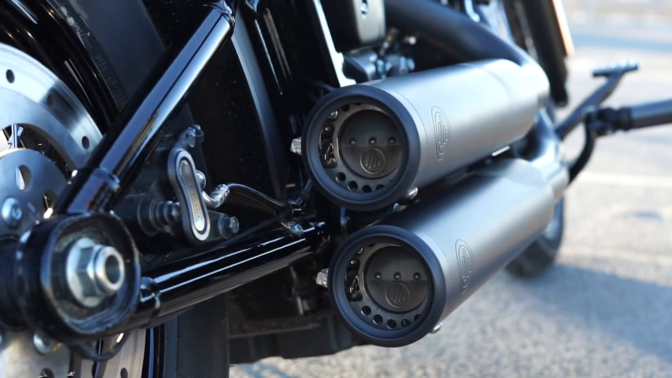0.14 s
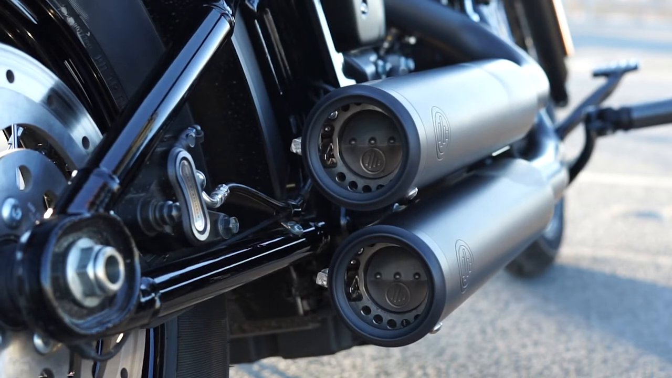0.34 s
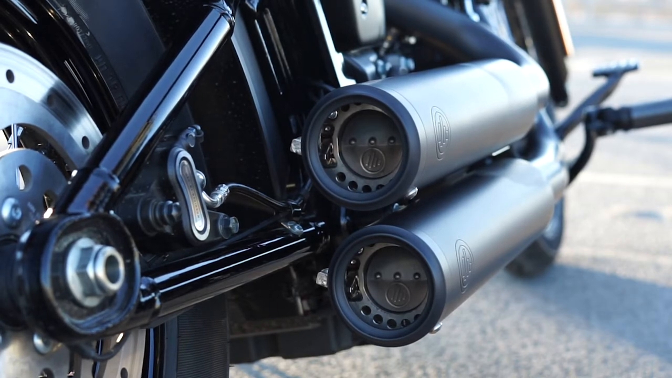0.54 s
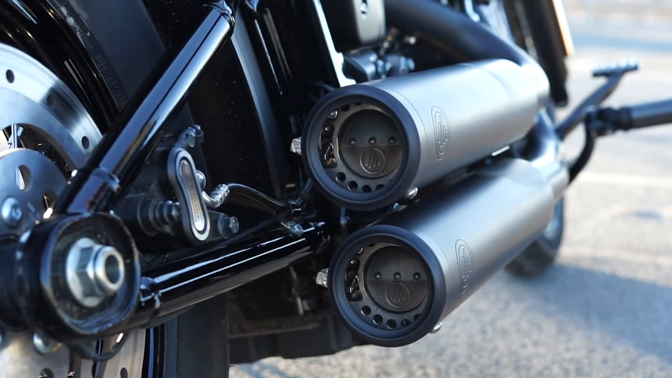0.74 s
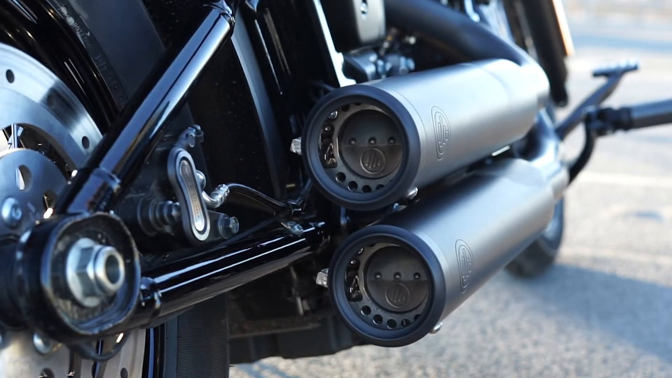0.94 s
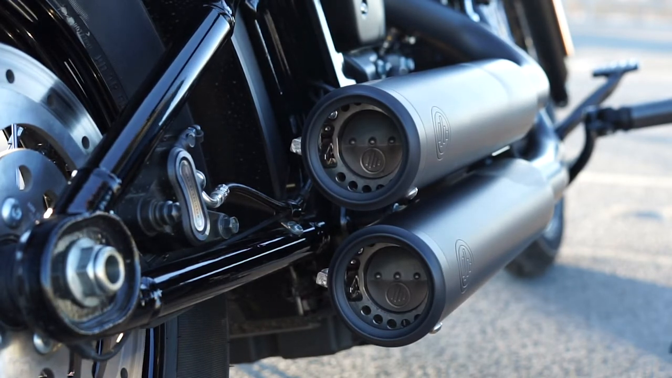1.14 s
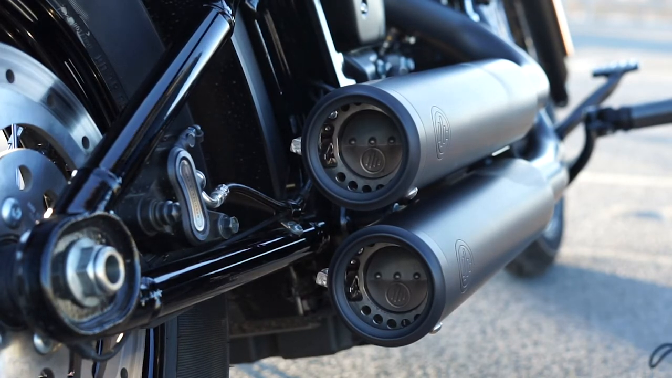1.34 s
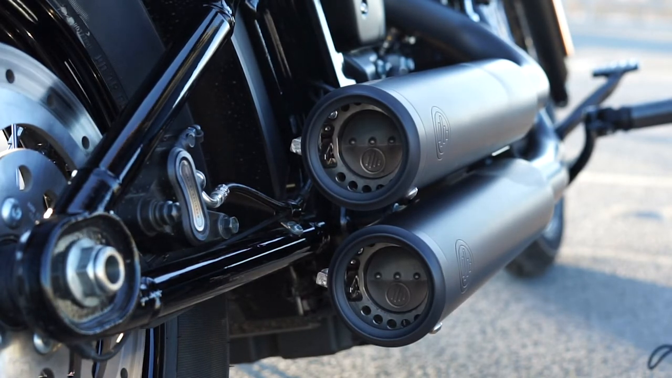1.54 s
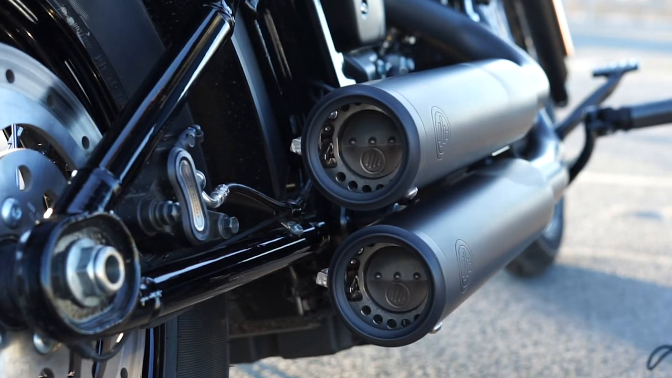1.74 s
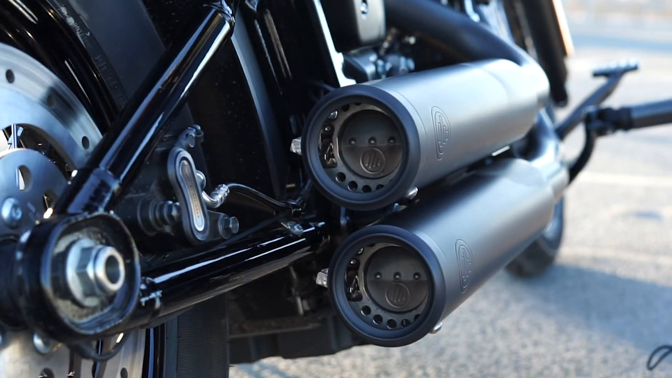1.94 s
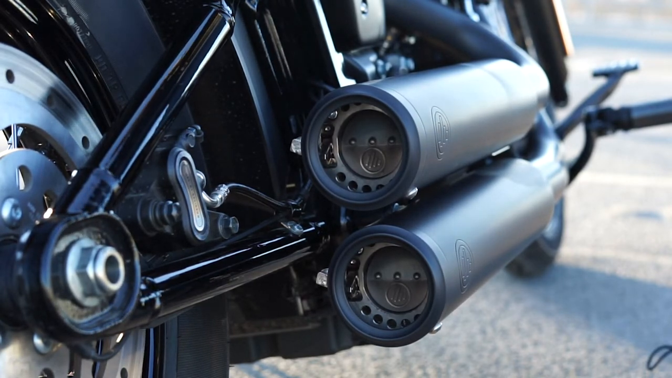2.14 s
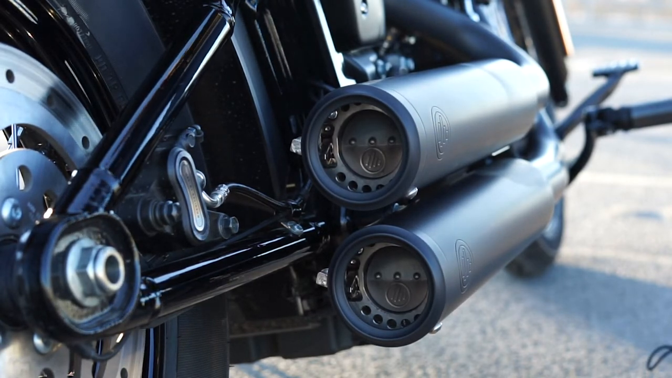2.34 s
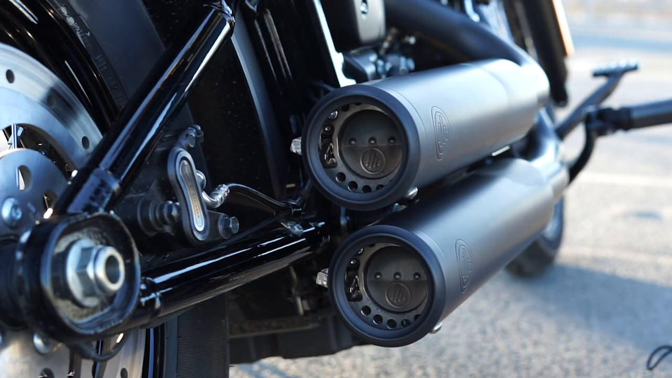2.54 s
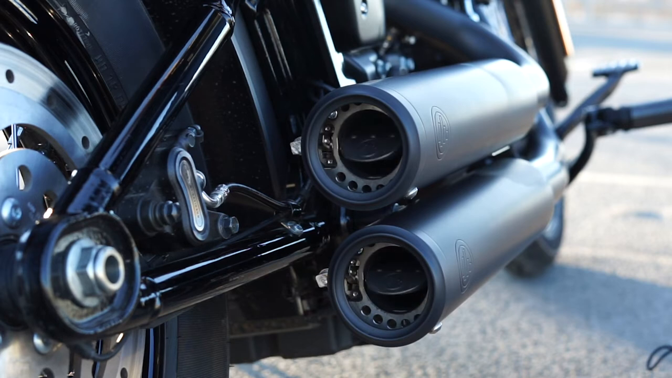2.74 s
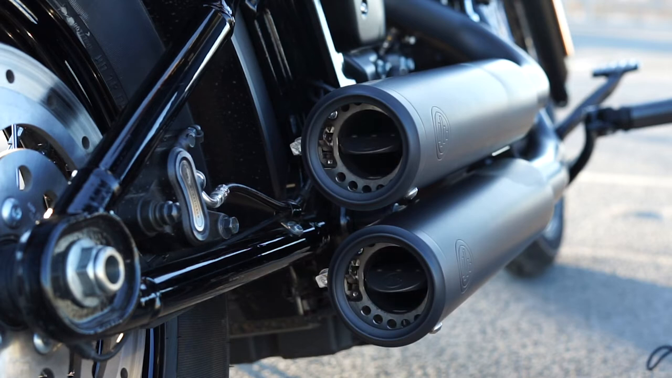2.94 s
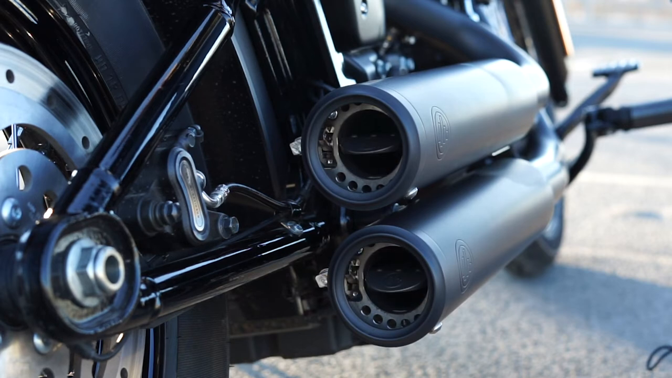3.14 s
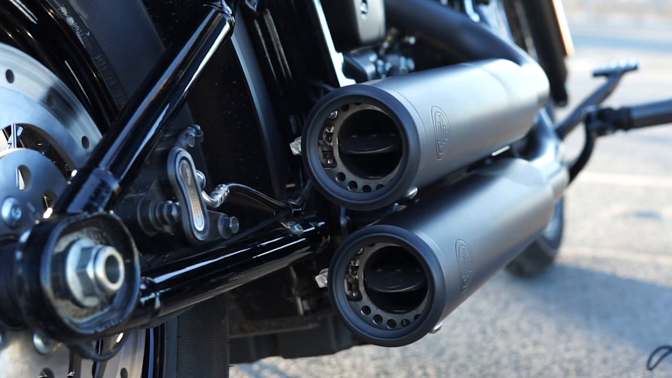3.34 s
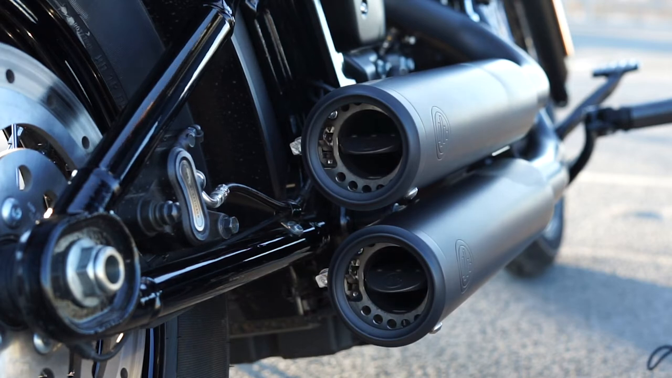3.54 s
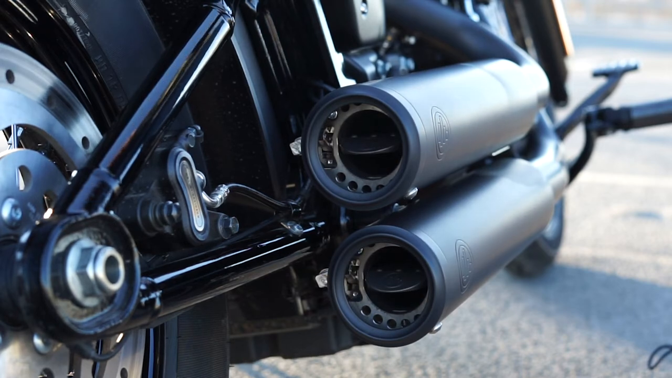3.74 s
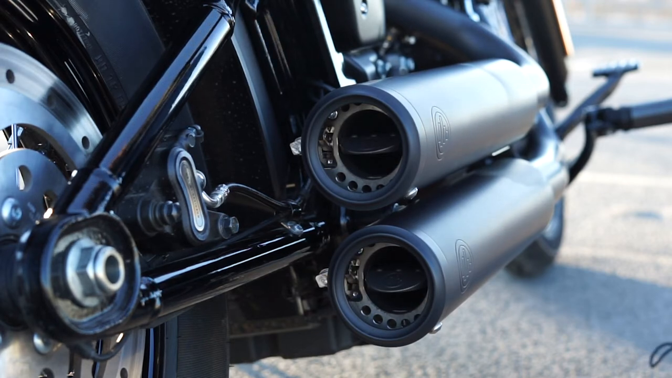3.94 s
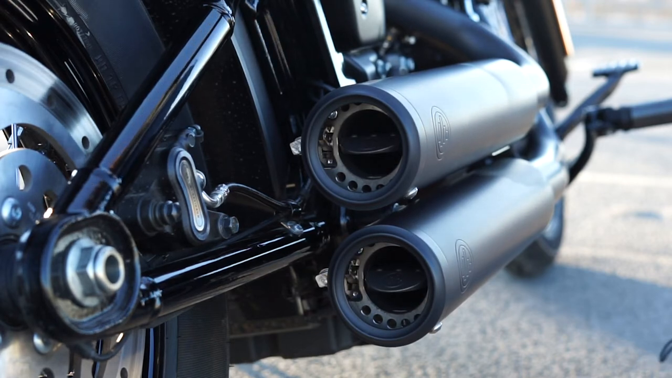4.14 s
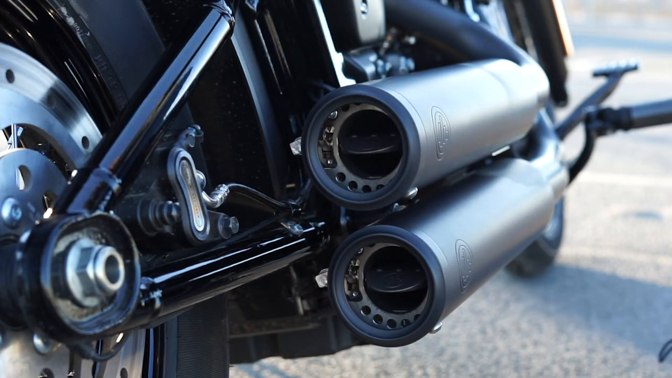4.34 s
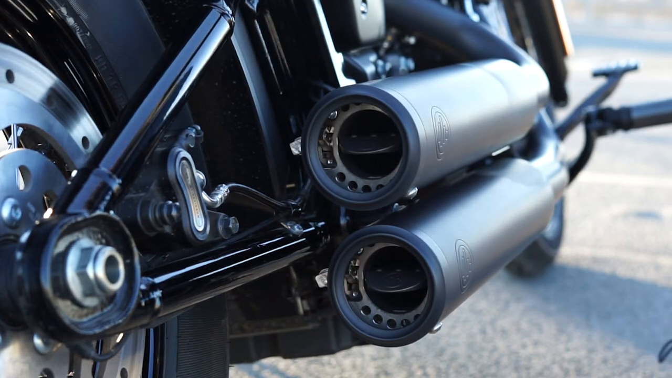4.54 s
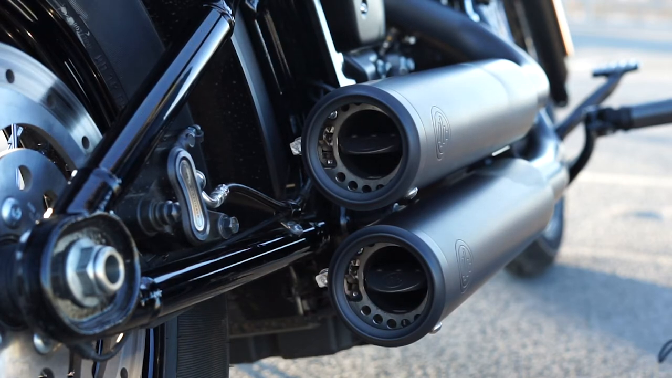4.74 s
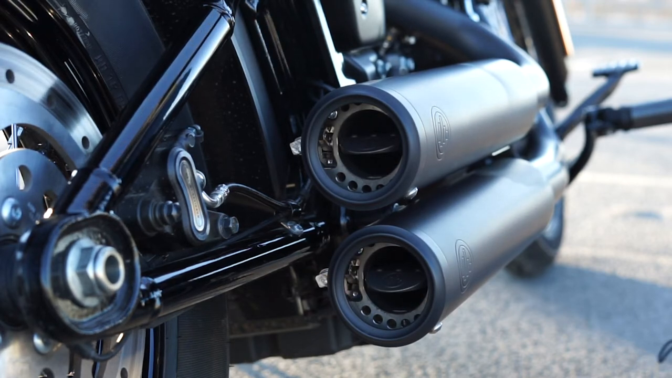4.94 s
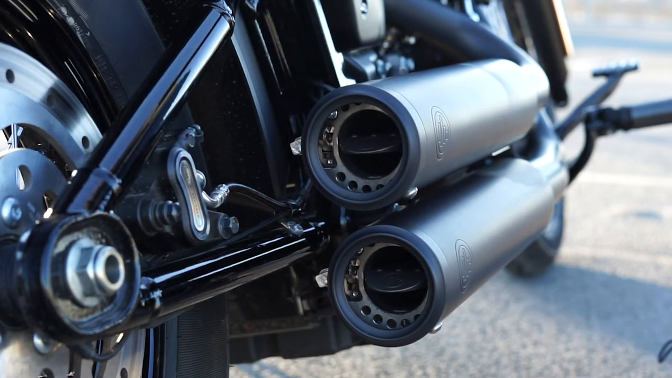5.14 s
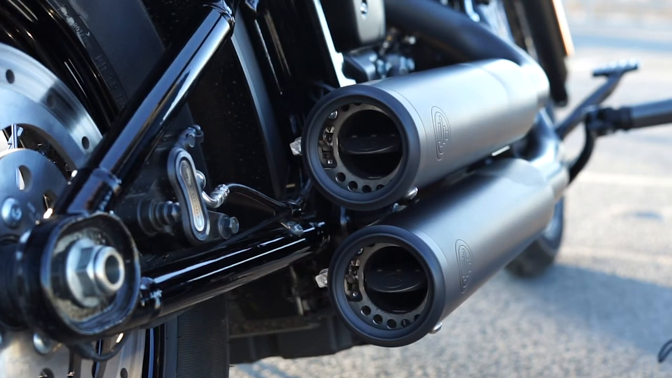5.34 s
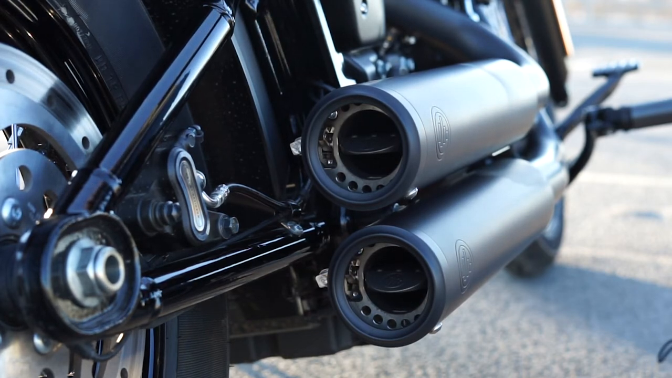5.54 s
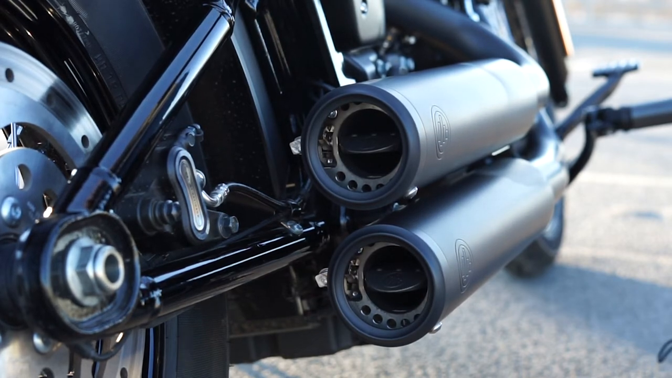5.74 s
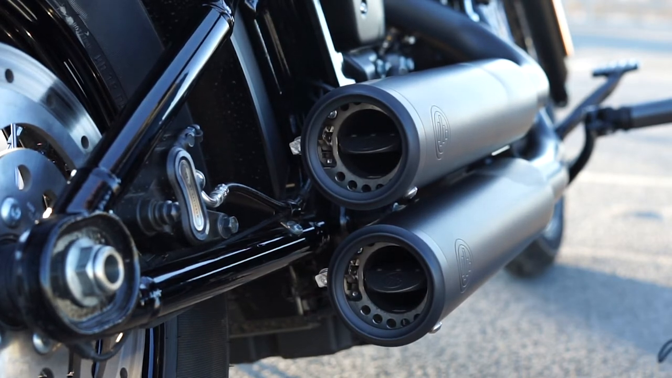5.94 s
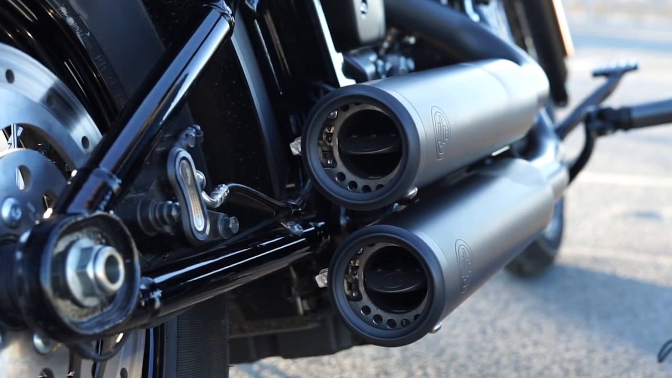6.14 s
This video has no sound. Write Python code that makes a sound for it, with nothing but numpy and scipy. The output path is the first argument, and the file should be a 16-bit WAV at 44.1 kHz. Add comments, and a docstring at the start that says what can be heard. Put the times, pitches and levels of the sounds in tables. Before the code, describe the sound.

Close behind a motorcycle, a subdued, uneven idle suddenly opens into a deep, rasping thump, ending with one sharp throttle blip.

```python
"""A big V-twin engine in a car park, heard close behind its two silencers, each closed by a flap.
First it sinks from high revs to an uneven idle: puffs of gas thud in the pipes and hiss past the flaps.
At about 2.7 s the flaps swing open, so the pipes boom and the firings leave as rasping cracks.
Near 5.8 s a quick twist of the throttle makes it bark. All along, the engine's moving parts clatter
underneath, and the loudest beats overload the microphone."""
import sys
import numpy as np
from scipy import signal
from scipy.fft import rfft, irfft
from scipy.io import wavfile
from scipy.ndimage import uniform_filter1d

SR = 44100
rng = np.random.default_rng(int(sys.argv[2]) if len(sys.argv) > 2 else 0)


def unload_wav(signal):
    """Save mono or channel-first audio to the path in sys.argv[1] as 16-bit WAV at rate SR, clipped to [-1, 1]."""
    wavfile.write(
        sys.argv[1],
        SR,
        np.round(np.clip(np.atleast_2d(signal).T, -1, 1) * 32767).astype(np.int16),
    )


N = 277389
T = np.arange(N) / SR
IDLE_RPM = 1000
CYCLE_DEG = 720  # the crankshaft turns twice for each cylinder to fire once
FLAP_OPENS_S, FLAP_SWING_S = 2.745, 0.062


def thump(crank, rpm, flap, overrun):
    """Puffs of gas make the pipes ring: short thuds with the flaps shut, a boom with them open."""
    # Four puffs per cylinder: valve opens, main surge, piston pushes the rest out, both valves open.
    # angle/deg, lead/s, width/s, strength when shut, strength when open, power by which speed fades it
    puffs = [(0, .013, 0.00076, 0.019, 0.65, -2), (0, 0.0039, 0.0011, 0.77, 1, 0.5),
             (109, 0.0028, 0.0023, 0.71, 0.035, -0.5), (211.2, 0.0006, 0.001, 0.026, 1, 1.5),
             (317, .012, 0.0013, 0.013, 0.45, -3.5), (308.9, 0, 0.002, 1, 0.9, 1),
             (449.7, 0.0019, 0.00087, 0.39, 0.1, 8.5), (531.8, 0.0022, 0.0014, 0.9, 0.74, 1)]
    # Pipe resonances when shut, when shut and slowing down, and when open: f/Hz, width/Hz, level/dB
    shut_modes = [(64.6, 39, -4.5), (122, 50, 0), (169, 55, -17)]
    burble_modes = [(89, 17, -11), (166, 32, 6.5), (197, 27, 0), (238, 18, -6.5)]
    open_modes = [(53.6, 16, -9), (92.7, 18.2, 3.5), (136.6, 47, -5), (230.2, 21.3, -2.5), (302.6, 50, -6)]
    # How loud the thump is over time: t/s, relative level/dB
    loudness = [(0.0, -13), (0.73, -23), (0.75, -16.5), (0.84, -19), (2.35, -16), (2.63, -17.5),
                (2.8, -8.5), (3.48, -8), (5.69, -11), (5.73, -22), (5.76, -6.5), (6.29, -6.5)]
    puff_delay_s = 0.0024  # a small delay of every thud
    muffler_hz = 353  # the silencer dulls the boom above this
    deg_per_s = rpm * 360 / 60
    shut_flow, open_flow = 0, 0
    for at_deg, lead_s, width_s, shut_size, open_size, fade in puffs:
        angle = crank + (lead_s - puff_delay_s) * deg_per_s
        puff = once_a_cycle(angle, at_deg, width_s * deg_per_s, scatter_db=2.0, wander_deg=6.94)
        puff *= (IDLE_RPM / rpm) ** fade
        shut_flow += shut_size * puff
        open_flow += open_size * puff
    swirl = 1 + 0.11 * noise([(20, -22), (200, 6.5), (400, 14), (700, -33), (2000, -52)])
    thuds = (1 - overrun / 2) * unit(ring(shut_flow * swirl, shut_modes))
    burble = 0.44 * overrun * unit(ring(shut_flow * swirl, burble_modes))
    muffler = signal.butter(4, muffler_hz, fs=SR, output="sos")
    boom = unit(signal.sosfiltfilt(muffler, ring(open_flow * swirl, open_modes)))
    pipes = (1 - flap) * (thuds + burble) + flap * boom
    average_level = np.sqrt(uniform_filter1d(pipes ** 2, size=SR // 4))  # over two idle cycles
    return undb(curve(loudness) + 1.0) * pipes / average_level


def rasp(crank, rpm, flap, throttle):
    """With the flaps open each firing leaves as a short crack: uneven at idle, a bark under throttle."""
    # Each cylinder's crack at idle: angle/deg, rasp level/dB, roar level/dB, random spread/dB
    cracks = [(-32.5, -19.5, -21, 1.3), (287, -30, -27.5, 3)]
    # Spells short of fuel, when the engine fires weakly: t/s, half length/s, level change/dB
    lean_spells = [(2.993, 0.067, -7), (4.233, 0.051, -6.5), (4.99, 0.056, -6), (5.228, 0.095, -5.5),
                   (5.662, 0.053, -7.5), (6.116, 0.05, -16)]
    # Tone of the bright rasp and of the lower roar: f/Hz, relative level/dB
    rasp_colour = [(1200, -9), (2000, -15), (2400, 2.5), (3000, 4.5), (3700, -3.5), (4200, -24), (4750, 2),
                   (5600, -23), (6300, -40), (6900, -16), (7600, -26), (8500, -14), (11000, -32),
                   (16000, -56)]
    roar_colour = [(250, 6.5), (500, 4.5), (650, -3.5), (780, 7), (1000, -9.5), (1250, -2), (2000, -7),
                   (4000, -8.5), (8000, -19), (16000, -25.5)]
    lead_s, width_s, ease_db_per_s = 0.003, 0.0037, 1.14
    bark_rasp_db, bark_roar_db = -12.5, -6.5
    deg_per_s = rpm * 360 / 60
    lean_db = sum(db * np.exp(-((T - s) / half_s) ** 4) for s, half_s, db in lean_spells)
    idling = (1 - throttle) * undb(lean_db - ease_db_per_s * since(FLAP_OPENS_S))
    bright, roar = 0, 0
    for at_deg, rasp_db, roar_db, scatter_db in cracks:
        burst = once_a_cycle(crank + lead_s * deg_per_s, at_deg, width_s * deg_per_s,
                             scatter_db * (1 - throttle), wander_deg=2.2, steepness=2.55)
        bright += burst * (idling * undb(rasp_db) + throttle * undb(bark_rasp_db))
        roar += burst * (idling * undb(roar_db) + throttle * undb(bark_roar_db))
    tear = 1 + 0.18 * noise([(200, 7), (900, -6), (3000, -37)])  # the jet breaks into small shocks
    return flap * tear * (bright * noise(rasp_colour) + roar * noise(roar_colour))


def chuff(crank, rpm, flap):
    """Gas squeezes past the shut flaps in hissing breaths, louder and steadier at higher speed."""
    # The breaths of one engine cycle: angle/deg, width/deg, strength
    breaths = [(-73, 42, 0.96), (121, 19, 0.27), (249, 37, 0.97), (501, 9.8, 0.46)]
    # Tone of the hiss: f/Hz, relative level/dB
    hiss_colour = [(300, -16), (700, -17), (1000, -7.5), (1400, 3), (2200, -2.5), (3300, 4.5), (4700, -5),
                   (5400, -2.5), (6000, -10.5), (6700, -4.8), (8700, -4.8), (10500, -12), (13500, -11),
                   (16000, -18)]
    pulses = sum(size * once_a_cycle(crank, at, width, scatter_db=0.7, wander_deg=8.7, steepness=2.44)
                 for at, width, size in breaths)
    lift = 0.63 * ramp(start_s=2.628, rise_s=0.079)  # the flaps lift a little just before they swing
    leak = np.clip(0.072 * (rpm / IDLE_RPM) ** 1.67 + lift, 0, 1)  # steady flow round their edges
    flow = leak + (1 - leak) * pulses
    flutter = 1 + 0.1 * noise([(50, 20), (500, -17), (2000, -21)])  # the jet wavers on the flap's edge
    level_db = -23.5 + 6.5 * np.log2(rpm / IDLE_RPM)
    return undb(level_db) * (1 - flap) * flow * flutter * noise(hiss_colour)


def clatter(crank, rpm, overrun):
    """Valves and chain rustle and tick, the metal casing rings, and a gear whines, most on slowing."""
    # Tone of the rustle: f/Hz, relative level/dB
    rustle_colour = [(100, 9), (300, 5.5), (420, 1), (680, -0.5), (830, 3), (1050, 0), (1400, -1.5),
                     (2200, -3), (2950, -4), (4000, -10.5), (6000, -21), (9000, -24), (12700, -29),
                     (16000, -38)]
    # Resonances of the casing: f/Hz, width/Hz, relative level/dB
    casing_modes = [(535.5, 29.6, 1), (575.4, 29, -7.5), (770, 84, -18.5), (885, 30, -15.5),
                    (1339, 56, -17.5), (2917, 120, -15.5)]
    # How loud the casing rings: t/s, level/dB
    casing_loudness = [(0, -26), (0.65, -40), (1.1, -33), (2.8, -31), (4.5, -36), (5.7, -36)]
    firing_deg, gear_teeth, ease_db_per_s = (0, 315), 90, 1.5
    load = sum(once_a_cycle(crank, at + 90, 57, scatter_db=2.5, wander_deg=56) for at in firing_deg)
    ticks = sum(once_a_cycle(crank, at + 130, 3.1, scatter_db=7, wander_deg=8.0) for at in firing_deg)
    rustle = undb(0.62) * unit(1 + 0.083 * load + 0.53 * ticks) * noise(rustle_colour)
    shaking = (0.76 + load) * rng.standard_normal(N)
    casing = 0
    for hz, width, db in casing_modes:
        tone = ring(shaking, [(hz, width, 0)])
        casing += ring(tone, [(hz, 4 * width, db)])  # a second pass trims the noise around the tone
    waver = noise([(5, -2), (35, -4), (120, -13), (500, -62)])
    whine = undb(-17.5 + 11.5 * overrun) * np.cos(gear_teeth * np.radians(crank)) * waver
    level_db = -31 + 6 * np.log2(rpm / IDLE_RPM) - ease_db_per_s * since(FLAP_OPENS_S)
    return undb(level_db) * (rustle + whine) + undb(curve(casing_loudness)) * unit(casing)


def rush(rpm, flap):
    """Gas whistles faintly past the open flaps, and adds a steady hiss at high revs."""
    # The whistle's narrow, high band: f/Hz, relative level/dB
    whistle_colour = [(12200, -70), (12600, 0), (13000, -70)]
    revving = np.clip(rpm / IDLE_RPM - 1, 0, 1)
    hiss = undb(-39.0) * revving * noise([(2000, -6), (4000, 8.5), (9000, -3.5), (16000, -10)])
    return flap * (hiss + undb(-67) * noise(whistle_colour))


def once_a_cycle(crank, at_deg, width_deg, scatter_db, wander_deg, steepness=2):
    """A bell-shaped pulse at one crank angle, with random strength and timing in each cycle."""
    cycle, angle = np.divmod(crank - at_deg + CYCLE_DEG / 2, CYCLE_DEG)
    timing, strength = rng.standard_normal((128, 2))[cycle.astype(int)].T
    offset = angle - CYCLE_DEG / 2 - wander_deg * timing
    return undb(scatter_db * strength) * np.exp(-.5 * np.abs(offset / width_deg) ** steepness)


def ring(x, modes):
    """Let x ring through side-by-side resonances: f/Hz, width/Hz, level/dB."""
    return sum(undb(db) * signal.lfilter(*signal.iirpeak(hz, hz / width, fs=SR), x)
               for hz, width, db in modes)


def noise(colour):
    """Noise of average level 1, its tone drawn through points: f/Hz, relative level/dB."""
    hz, db = np.transpose(colour)
    f = np.arange(N // 2 + 1) * SR / N
    gain = undb(np.interp(np.log(f + 1), np.log(hz), db))
    return unit(irfft(rfft(rng.standard_normal(N)) * gain, N))


def unit(x):
    """Scale to an average level (rms) of 1."""
    return x / np.sqrt(np.mean(x ** 2))


def undb(db):
    """Turn decibels into a multiplier."""
    return 10 ** (np.asarray(db) / 20)


def curve(rows):
    """Join points (t/s, value) with straight lines."""
    return np.interp(T, *np.transpose(rows))


def ramp(start_s, rise_s):
    """Rise from 0 to 1 in a straight line."""
    return np.clip((T - start_s) / rise_s, 0, 1)


def since(s):
    """Seconds gone by since a moment; 0 before it."""
    return np.maximum(T - s, 0)


def scene():
    """The turning crankshaft times the beats; the flaps set the exhaust's voice, the throttle its bark."""
    # Engine speed: t/s, speed/rpm
    speed = [(0.0, 2196), (0.22, 1779), (0.72, 1128), (1.17, 948), (1.64, 1055), (2.55, 962), (2.7, 1218),
             (2.85, 946), (3.39, 928), (3.53, 1050), (3.72, 894), (3.94, 1045), (4.45, 933), (4.96, 1003),
             (5.17, 961), (5.35, 867), (5.55, 1015), (5.77, 986), (5.85, 1285), (5.97, 2185), (6.29, 1754)]
    start_deg = -257
    blip_s, attack_s, hold_s, release_s = 5.765, 0.055, 0.15, 0.035  # the twist of the throttle
    rpm = curve(speed)
    crank = start_deg + np.cumsum(rpm) * 360 / 60 / SR
    flap = ramp(FLAP_OPENS_S - FLAP_SWING_S / 2, FLAP_SWING_S)  # 0 shut, 1 open
    throttle = ramp(blip_s, attack_s) * np.exp(-since(blip_s + attack_s + hold_s) / release_s)
    overrun = (1 - flap) * np.clip((rpm - 1050) / 200, 0, 1)  # 1 while coasting fast against shut flaps
    exhaust = thump(crank, rpm, flap, overrun) + chuff(crank, rpm, flap)
    exhaust += rasp(crank, rpm, flap, throttle) + rush(rpm, flap)
    return (exhaust + clatter(crank, rpm, overrun))[None]


def record(dry):
    """The microphone flattens the loudest beats, and the highest treble is cut."""
    top_hz = 15850
    rounded = dry / (1 + dry ** 14) ** (1 / 14)
    return signal.sosfilt(signal.ellip(12, .2, 90, top_hz, fs=SR, output="sos"), rounded)


dry = scene()
out = record(dry)
unload_wav(out)
```